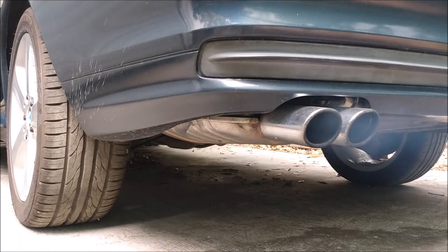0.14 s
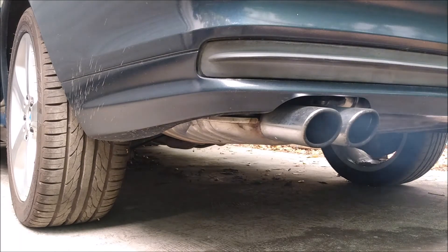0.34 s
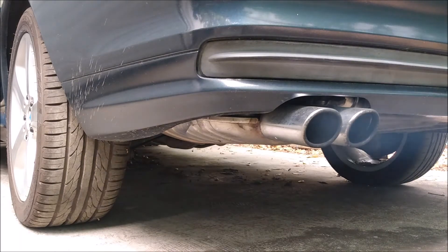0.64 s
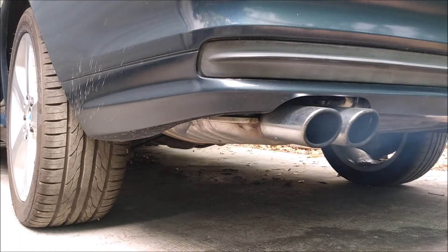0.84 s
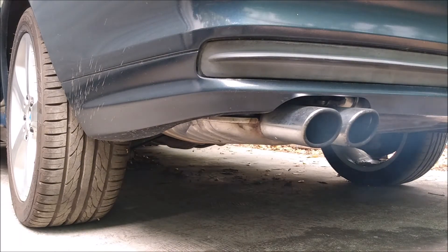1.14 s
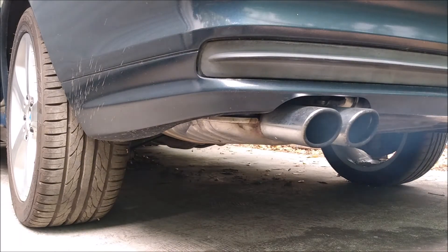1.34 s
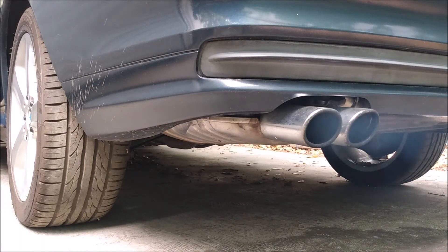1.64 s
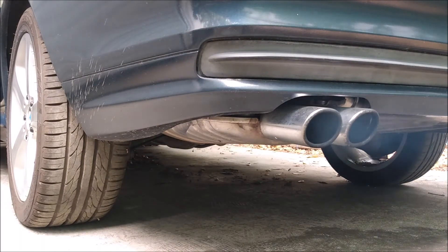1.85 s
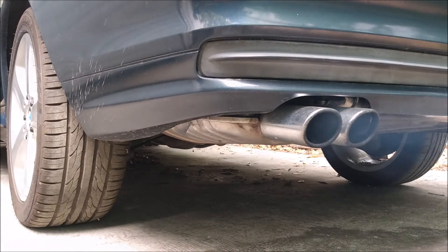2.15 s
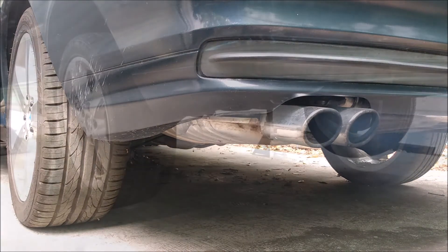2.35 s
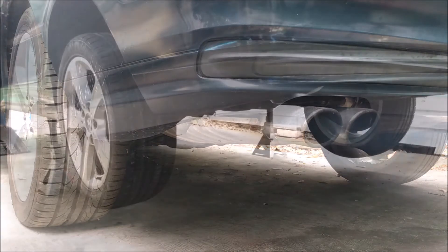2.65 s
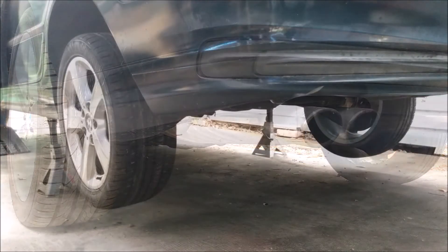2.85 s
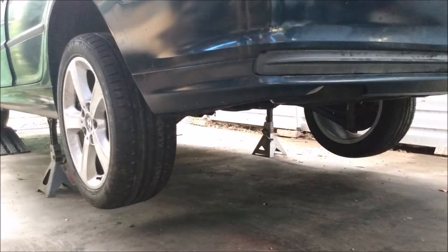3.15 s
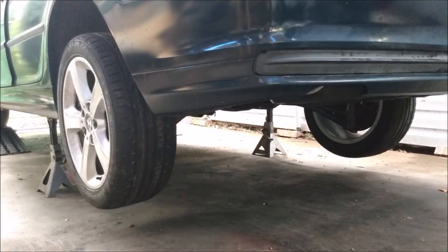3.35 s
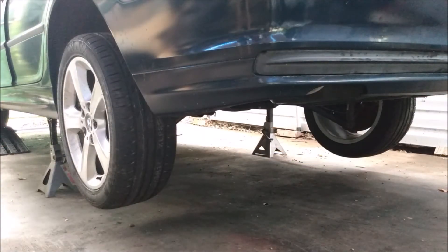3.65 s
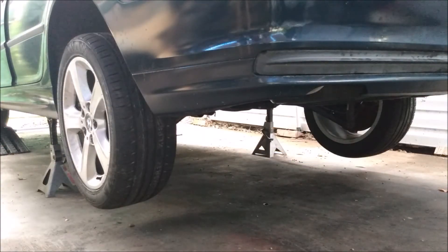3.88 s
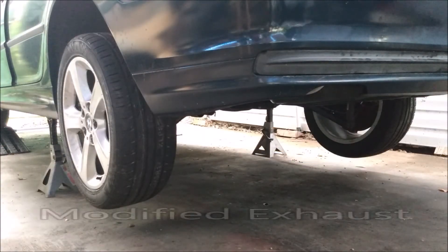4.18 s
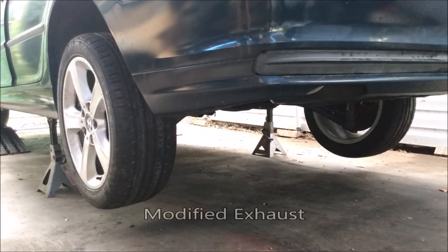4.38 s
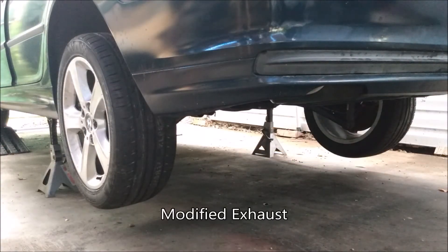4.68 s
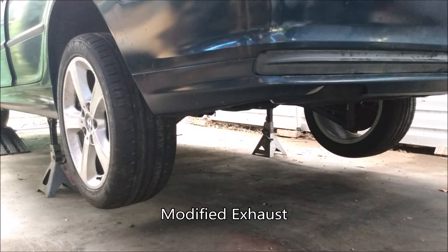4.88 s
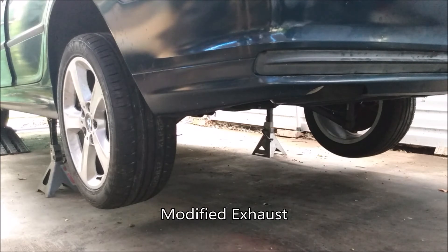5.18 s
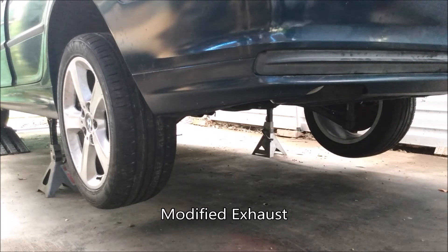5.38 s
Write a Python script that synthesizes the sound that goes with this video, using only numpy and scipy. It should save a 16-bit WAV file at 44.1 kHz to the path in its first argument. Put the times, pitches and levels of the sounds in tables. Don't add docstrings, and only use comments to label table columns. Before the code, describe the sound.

Close behind a six-cylinder car on a concrete floor, a stereo camera picks up a fast, smooth cold idle at about 1,040 rpm: a low, rounded exhaust drone through a silencer, with fluttering gas hiss, soft bay clatter and a thin belt whine. Between about 0.6 and 1 second the idle eases down slightly and its tone changes as load drops, while it begins a slow fade that ends near 3.1 seconds. From 2.2 seconds a second idle rises underneath, reaching full level around 4.8. It is slower, near 710 rpm, deeper and lumpier, with a boomy puff once per cycle, uneven hiss and rougher clatter, hunting gently in speed. At about 3.29 seconds a sharp, brief valve snap scatters between floor pan and concrete. Faint metallic ticks follow near 3.6, 4.3, 4.75 and 5.3 seconds, as the rough idle continues to the end.

```python
import sys
import numpy as np
from scipy import signal
from scipy.fft import rfft, irfft, next_fast_len
from scipy.io import wavfile
from scipy.ndimage import uniform_filter1d, map_coordinates

SR = 44100
rng = np.random.default_rng(int(sys.argv[2]) if len(sys.argv) > 2 else 0)


def master(y):
    cut = np.clip(np.atleast_2d(y).T, -1, 1)
    pcm = np.round(cut * 32767)
    wavfile.write(sys.argv[1], SR, pcm.astype(np.int16))


def invert_db(x):
    u = np.asarray(x, float) / 20
    return 10 ** u


N = 243429

# (frequency [Hz], correlation [-1 to 1])
SLOW_ALIKE = [(60, 1), (130, 0.77), (290, 1), (640, 0.61), (1400, 0.081), (2100, -0.17), (5500, -0.023),
              (7600, -0.15), (10000, 0.12), (16000, -0.032)]
# (frequency [Hz], left minus right [dB])
SLOW_SIDES = [(60, -1.5), (92, -1.0), (140, 1.0), (210, -0.5), (330, -0.5), (500, 2.0), (770, -2.0),
              (1170, -1.5), (1790, -0.5), (2740, -0.5), (4190, -0.5), (6410, -1.0), (9810, -4.0),
              (15000, 0.5)]


def fast_idle():
    fast_cyl = [(1.0, 0.0), (1.048, 0.013), (1.036, 0.002), (1.094, 0.017), (1.063, 0.001), (1.103, 0.017)]
    # (centre [Hz], width [Hz], signed gain [ratio])
    fast_pipe = [(65.0, 38.3, -5.0), (74.7, 41.4, 4.489), (161.6, 20.2, -0.109), (222.2, 11.7, 0.15),
                 (299.9, 8.0, 0.033), (368.0, 22.1, -0.024)]
    # (centre [Hz], width [Hz], gain [dB])
    loaded = [(103, 48, -2.5), (209.6, 6.5, -6), (318, 21, 10), (272, 15, -2), (413, 83, -5.5)]
    unloaded = [(100, 21, 1.5), (150, 5.6, -2), (205, 42, 2), (308, 8.3, -4.5), (355, 20, 5.5),
                (406, 9.3, 3)]
    # (multiple of the cycle rate), then (level against the drone [dB])
    fast_orders = [71, 72, 73, 90, 144, 168, 198, 243]
    fast_whine = [-46.5, -35, -48, -46.5, -47.5, -52.5, -51.5, -52.5]
    # (frequency [Hz], density [dB per Hz])
    fast_rumble = [(12, -16), (30, -16), (60, 3), (100, 4.5), (200, -6), (300, -30)]
    fast_body = [(140, -4.5), (230, -4), (258, -12.5), (378, -10), (491, -21), (560, -14.5), (620, -10.5),
                 (707, -11), (783, -14), (1160, -17), (1960, -19.5), (2660, -23), (7500, -37.5),
                 (9750, -58), (16500, -120)]
    fast_hiss = [(4410, -43), (7500, -42), (8570, -2), (10700, 8), (14000, 3), (15100, -3), (16000, -23)]
    # (centre [Hz], width [Hz], gain [dB])
    fast_bay = [(1190, 55, -4), (1452, 7.4, 4.5), (1970, 52, 3), (2520, 16, 5), (4630, 45, 2.5),
                (6920, 91, 8.5), (7800, 370, -8)]
    # (frequency [Hz], correlation [-1 to 1])
    fast_alike = [(60, 0.81), (290, 0.82), (640, 0.65), (1400, 0.077), (2100, 0.08), (2800, -0.091),
                  (4100, -0.4), (7000, -0.17), (11000, -0.01), (13800, -0.23), (16000, 0.65)]
    # (frequency [Hz], left minus right [dB])
    fast_sides = [(60, -1.0), (92, -1.0), (140, -1.0), (210, -0.5), (330, -1.5), (500, -0.5), (770, -1.0),
                  (1170, 0.5), (1790, -0.5), (2740, -0.5), (4190, 0.5), (6410, 0.0), (9810, -1.5),
                  (15000, 4.0)]

    t = np.arange(N) / SR
    cold_rpm, warm_rpm, sag_rpm_per_s = 1042.4, 1025.9, 6.06
    step_s = (.56, .97)
    rpm = cold_rpm + (warm_rpm - cold_rpm) * ramp(step_s)
    rpm = rpm - sag_rpm_per_s * np.maximum(t - step_s[1], 0)
    cycle = cycles(rpm, mark=(.5, .535))

    unload_s = (.68, .88)
    eased = .094 * ramp((0, unload_s[0]))
    load = np.clip(1 - eased, 0, 1) * (1 - ramp(unload_s))
    gas = exhaust(cycle, fast_cyl, fast_pipe, scatter=.008, top_hz=450)
    under_load = filtered(gas, lambda hz: bumps(loaded, hz))
    free = filtered(gas, lambda hz: bumps(unloaded, hz))
    drone = invert_db(1.94 * load) * (load * under_load + (1 - load) * free)
    tone = drone + whine(cycle, fast_orders, fast_whine, unsteady_db=2.5) + whistles()

    rumble = invert_db(-33) * rush(fast_rumble, fast_alike, patchy_db=1)
    bay = filtered(rush(fast_body, fast_alike, patchy_db=.6), lambda hz: bumps(fast_bay, hz))
    body = invert_db(-29) * throb(cycle, [(6, .11, .26), (8, .1, .27)]) * bay
    jet = rush(fast_hiss, fast_alike, patchy_db=.4)
    hiss = invert_db(-40.5) * throb(cycle, [(6, .15, .11), (3, .05, .1), (2, .05, .16)]) * jet

    heard = sides(tone + rumble + body + hiss, fast_sides, lead=-.071)
    heard = heard + .033
    return invert_db(-14.5) * (1 - ramp((.56, 3.115))) * heard


def slow_idle():
    # (time [s], crank speed [rpm])
    hunt = [
        (2.35, 699.9),
        (2.59, 712.7),
        (3.09, 714.9),
        (3.52, 706.5),
        (3.88, 717.6),
        (4.3, 709.7),
        (4.76, 706.6),
        (4.97, 712.4),
        (5.35, 714),
    ]
    slow_cyl = [(1.0, 0.0), (0.876, 0.003), (0.919, -0.005), (0.792, 0.005), (0.94, -0.006), (0.84, 0.012)]
    # (centre [Hz], width [Hz], signed gain [ratio])
    slow_pipe = [(65.1, 6.0, 1.813), (71.9, 17.9, -2.278), (87.9, 16.7, 2.011), (132.3, 12.4, 4.518),
                 (136.5, 6.8, -5.0), (152.7, 28.0, -0.468), (192.9, 6.0, -1.273), (194.9, 10.5, 1.089),
                 (203.1, 7.2, -0.491)]
    # (multiple of the cycle rate), then (level against the drone [dB])
    slow_orders = [54, 57, 90, 99, 114, 120]
    slow_whine = [-49, -38.5, -40.5, -40, -44, -58]
    # (frequency [Hz], density [dB per Hz])
    chamber = [(200, -60), (290, -11), (320, 21), (345, -5), (375, -24), (600, -62)]
    bend = [(120, -60), (175, -20), (195, 0), (215, -1), (235, -20), (350, -60)]
    # (frequency [Hz], density [dB per Hz])
    slow_rumble = [(12, -9), (25, -6), (45, -2), (60, -4.5), (130, 6.5), (200, -1), (300, -30)]
    slow_body = [(140, -6), (230, -4.5), (274, -7.5), (336, -2.5), (431, -13), (520, -7.5), (867, -11),
                 (1230, -11.5), (2050, -17), (2410, -18.5), (2590, -20), (4700, -23.5), (7500, -37.5),
                 (9750, -59), (16500, -120)]
    slow_hiss = [(4410, -35), (7500, -39), (8870, -5), (10200, 7.5), (10900, 8), (15000, -2),
                 (16000, -24.5)]
    # (centre [Hz], width [Hz], gain [dB])
    slow_bay = [(496, 40, 5), (660, 36, -3), (1003, 29, 4), (1227, 17, 5), (2410, 37, 4), (2820, 64, 4.5),
                (3170, 61, 3.5), (3580, 30, 6.5), (4030, 230, -2), (4720, 100, 4.5), (5630, 150, 3.5),
                (6000, 150, -2), (6820, 65, 15.5), (7600, 320, -2)]

    rpm, = curves(hunt)
    cycle = cycles(rpm, mark=(4.3, .368))
    gas = exhaust(cycle, slow_cyl, slow_pipe, scatter=.017, top_hz=228)
    tone = gas + whine(cycle, slow_orders, slow_whine, unsteady_db=2)

    boom = invert_db(-41) * throb(cycle, [(1, .99, .19)]) * rush(chamber, SLOW_ALIKE, patchy_db=-2.5)
    boom += invert_db(-41) * throb(cycle, [(1, 1.3, .16)]) * rush(bend, SLOW_ALIKE, patchy_db=0)
    lumps = throb(cycle, [(1, .043, .61), (2, .081, .43)])
    rumble = invert_db(-24) * lumps * rush(slow_rumble, SLOW_ALIKE, patchy_db=1.5)

    bay = filtered(rush(slow_body, SLOW_ALIKE, patchy_db=.9), lambda hz: bumps(slow_bay, hz))
    body = invert_db(-28) * throb(cycle, [(3, .024, .087), (2, .062, .048)]) * bay
    puffs = throb(cycle, [(1, .15, .56), (2, .05, 1.0), (3, .098, .43), (6, .15, .11)])
    hiss = invert_db(-34 + .7 * wobble(16)) * puffs * rush(slow_hiss, SLOW_ALIKE, patchy_db=.6)

    governor_rpm, swell_db_per_rpm = 711, .0449
    pipe = invert_db(swell_db_per_rpm * (rpm - governor_rpm)) * (tone + boom + rumble)
    return invert_db(-16.5) * ramp((2.19, 4.777)) * sides(pipe + body + hiss, SLOW_SIDES, lead=.09)


def exhaust(cycle, cylinders, pipe, scatter, top_hz):
    firing = np.arange(np.ceil(cycle[0] * 6) - 12, cycle[-1] * 6 - 1).astype(int)
    charge, late = np.array(cylinders)[firing % 6].T
    gap = N / (cycle[-1] - cycle[0]) / 6
    lead = 13 * gap
    known_firings = 6 * np.r_[cycle[0] - 13 / 6, cycle]
    at = np.interp(firing + late, known_firings, np.r_[0, lead + np.arange(N)])
    size = charge * (1 + scatter * rng.standard_normal(len(at))) * gap / 2

    whole, part, length = at.astype(int), at % 1, N + SR
    train = np.bincount(whole, size * (1 - part), length)
    train = train + np.bincount(whole + 1, size * part, length)

    f = np.fft.rfftfreq(length, 1 / SR)
    ring = sum(g * 1j * f * w / (c * c - f * f + 1j * f * w) for c, w, g in pipe)
    mouth = (1j * f / (40 + 1j * f)) ** 2
    silencer = 1 / (1 + (f / top_hz) ** 12)
    return irfft(rfft(train) * ring * mouth * silencer, length)[round(lead):][:N]


def cycles(rpm, mark):
    done = np.cumsum(rpm / 60 / 2) / SR
    return done - done[round(mark[0] * SR)] + mark[1]


def throb(cycle, depths):
    return np.exp(sum(depth * np.cos(2 * np.pi * (k * cycle - turn)) for k, depth, turn in depths))


def whine(cycle, orders, levels_db, unsteady_db):
    out = np.zeros(N)
    for order, db in zip(orders, levels_db):
        level = invert_db(db + unsteady_db * wobble(6))
        out += level * np.sin(2 * np.pi * order * cycle + .5 * wobble(3.97))
    return out


def snap():
    # (time [s], level [dB], decay time t60 [s])
    bursts = [
        (3.2872, -29, .025),
        (3.293, -35, .24),
    ]
    # (frequency [Hz], density [dB per Hz])
    snap_tone = [(250, -26), (500, -1), (1260, -12), (2000, -7.5), (3000, -3.5), (4600, -3), (5500, -10),
                 (6800, -4), (8450, -18.5), (10800, -2.5), (13000, -13), (16000, -22)]
    # (time [s], level [dB], frequency [Hz], decay time t60 [s])
    snap_ring = [
        (3.288, -22, 4500, .006),
        (3.2885, -26, 11400, .007),
        (3.294, -30, 3500, .008),
        (3.246, -38, 312, .1),
    ]
    t = np.arange(N) / SR
    fall = np.zeros(N)
    for s, db, t60 in bursts:
        onset = np.clip((t - s) / .00029, 0, 1)
        fall += invert_db(db - 60 * np.abs(t - s) / t60) * onset
    air = rush(snap_tone, SLOW_ALIKE, patchy_db=.5)
    return sides(fall * air, SLOW_SIDES, lead=.09) + struck_metal(snap_ring)


def pings():
    # (time [s], level [dB], frequency [Hz], decay time t60 [s])
    ticks = [
        (3.568, -49, 4780, .03),
        (4.3, -54, 6930, .03),
        (4.75, -45, 4700, 0.026),
        (5.31, -46, 4720, .03),
        (5.35, -52, 6930, .03),
    ]
    return struck_metal(ticks)


def struck_metal(strikes):
    out, t = np.zeros((2, N + SR)), np.arange(SR // 10) / SR
    for s, db, hz, t60 in strikes:
        ring = invert_db(db - 60 * t / t60) * (1 - np.exp(-t / .0012))
        phase = rng.uniform(0, 1, (2, 1))
        out[:, round(s * SR):][:, :len(t)] += ring * np.sin(2 * np.pi * hz * t + phase)
    return out[:, :N]


def whistles():
    # (frequency [Hz], level against the drone [dB])
    electric = [(9080, -69), (13620, -68)]
    t = np.arange(N) / SR
    return sum(invert_db(db + wobble(5)) * np.sin(2 * np.pi * hz * t) for hz, db in electric)


def rush(spectrum, alike, patchy_db):
    z = signal.stft(rng.standard_normal((2, N)), nperseg=512)[2]
    field = uniform_filter1d(rng.standard_normal(z.shape[1:]), size=8, axis=0)
    field = uniform_filter1d(field, size=8, axis=1)
    pair = signal.istft(z * invert_db(patchy_db * unit(field)), nperseg=512)[1][:, :N]

    def response(hz):
        turn = np.arccos(np.clip(along(alike, hz), -1, 1)) / 2
        return invert_db(along(spectrum, hz)) * [np.cos(turn), np.sin(turn)]

    mid, side = filtered(pair, response)
    return unit(np.array([mid + side, mid - side]))


def sides(x, balance, lead):
    # (centre [Hz], width [Hz], gain [dB])
    ports = [(8800, 1100, -2), (12800, 1300, 2)]

    def response(hz):
        tilt = invert_db(along(balance, hz)) * bumps(ports, hz) * np.exp(1j * lead * np.exp(-hz / 200))
        return np.sqrt(tilt) ** np.array([[1], [-1]])

    return filtered(x, response)


def bumps(modes, hz):
    return invert_db(sum(db * np.exp(-.5 * ((hz - c) / w) ** 2) for c, w, db in modes))


def filtered(x, response):
    m = next_fast_len(N + SR // 2)
    return irfft(rfft(x, m) * response(np.fft.rfftfreq(m, 1 / SR)), m)[..., :N]


def along(points, hz):
    f, v = np.transpose(points)
    return np.interp(np.log(hz + 1), np.log(f + 1), v)


def curves(rows):
    s, *cols = np.transpose(rows)
    return [np.interp(np.arange(N) / SR, s, c) for c in cols]


def ramp(span):
    return np.clip((np.arange(N) / SR - span[0]) / (span[1] - span[0]), 0, 1)


def wobble(rate):
    knots = rng.standard_normal(int(N * rate / SR) + 4)
    return map_coordinates(knots, [np.arange(N) * rate / SR])


def unit(x):
    return x / np.sqrt(np.mean(x ** 2) + 1e-20)


def scene():
    return fast_idle() + slow_idle() + snap() + pings()


def band_limit(x):
    return signal.sosfilt(signal.butter(12, 16460, fs=SR, output="sos"), x)


def record(dry):
    top_hz = 15785
    mix = filtered(dry, lambda hz: hz < top_hz)
    return band_limit(mix)


dry = scene()
out = record(dry)
master(out)
```